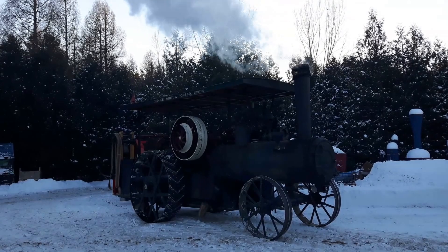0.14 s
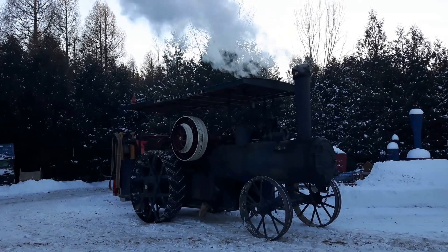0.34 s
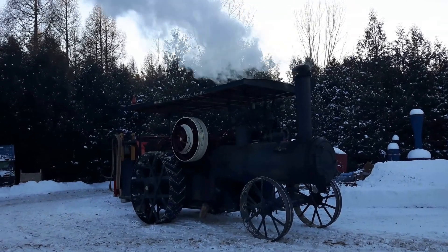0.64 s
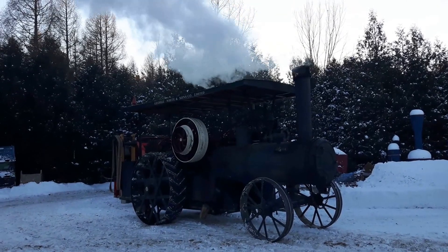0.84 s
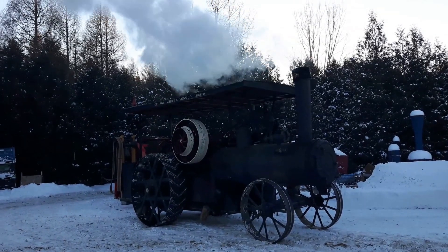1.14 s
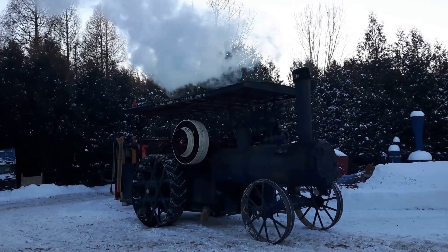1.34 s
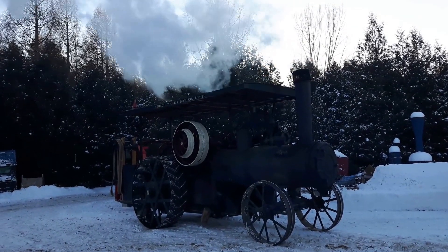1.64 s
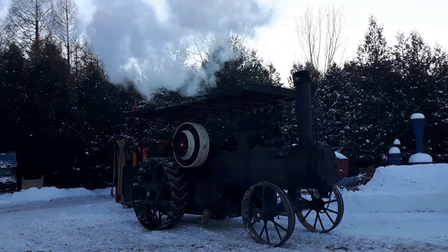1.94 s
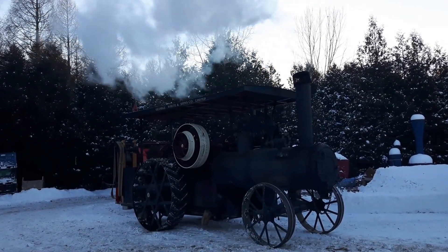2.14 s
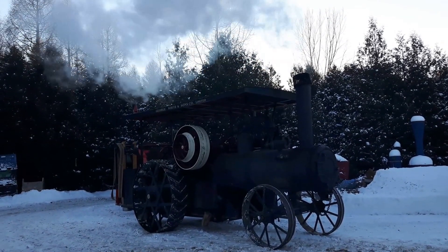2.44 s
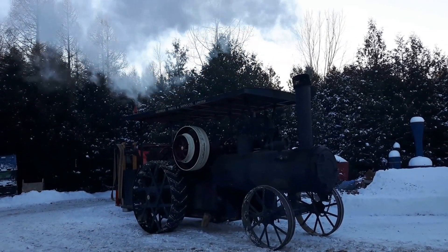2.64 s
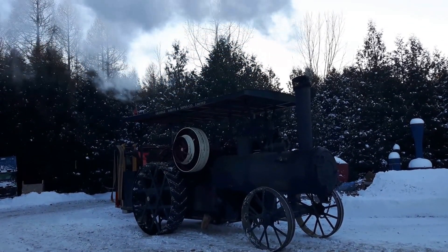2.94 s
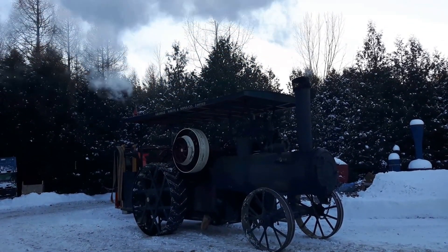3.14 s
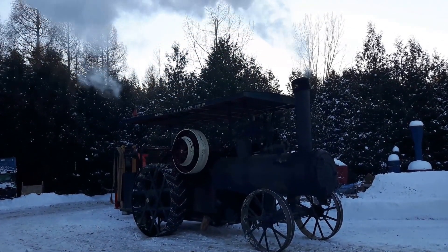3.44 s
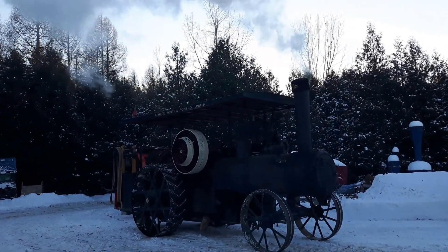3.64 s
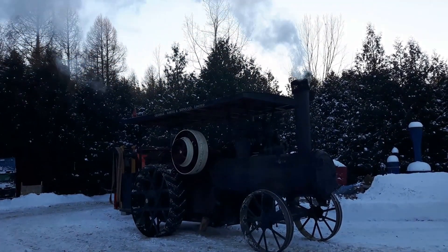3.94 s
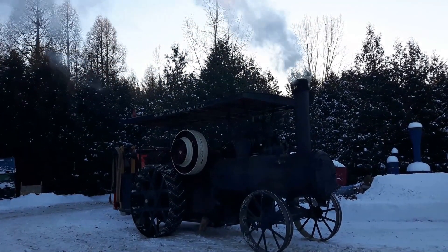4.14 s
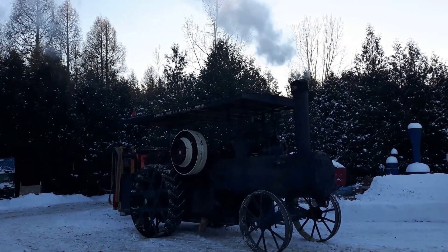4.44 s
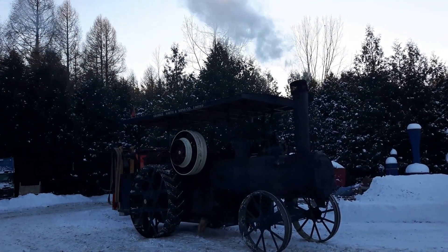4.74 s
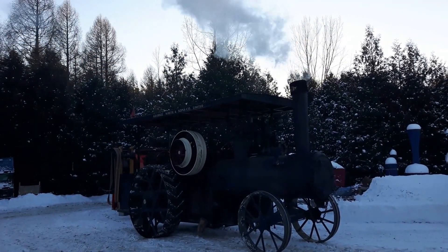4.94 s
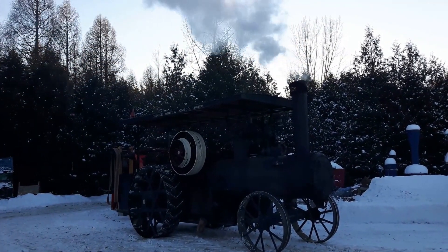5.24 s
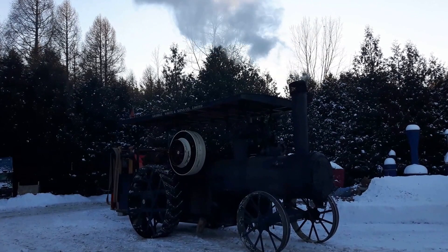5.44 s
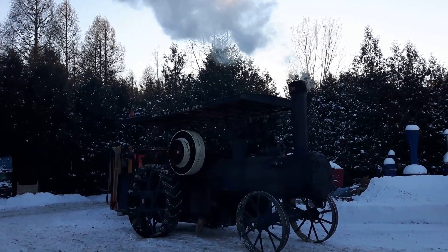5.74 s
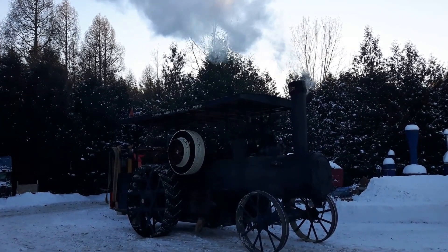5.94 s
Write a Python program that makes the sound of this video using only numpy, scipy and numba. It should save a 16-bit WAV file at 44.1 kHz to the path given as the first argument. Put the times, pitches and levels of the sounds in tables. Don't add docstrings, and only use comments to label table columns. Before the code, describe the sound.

Low, wavering engine hum beside softly hissing steam and fire draught; one short hard thump, then a quick metallic clatter with a deep bump.

```python
import sys
import numpy as np
from scipy import signal
from scipy.io import wavfile
from scipy.ndimage import uniform_filter1d
from numba import njit

SR = 44100
rng = np.random.default_rng(int(sys.argv[2]) if len(sys.argv) > 2 else 0)


def attenuation_scalar(level_db):
    decades = np.asarray(level_db, float) / 20
    return 10 ** decades


def unload_wav(signal):
    wavfile.write(
        sys.argv[1],
        SR,
        np.round(np.clip(np.atleast_2d(signal).T, -1, 1) * 32767).astype(np.int16),
    )


N = 269010
TIME = np.arange(N) / SR

# time in seconds, turn rate in Hz, load as level of the booming fifth order in dB.
IDLE_CURVE = [(0.0, 24.3, -33), (0.13, 24.0, -34), (0.46, 25.6, -36), (1.0, 24.7, -41), (1.51, 25.6, -48),
              (1.68, 25.9, -35), (2.01, 25.3, -46), (2.29, 26.6, -32), (2.57, 25.0, -42), (2.84, 26.5, -34),
              (3.27, 24.7, -41), (4.05, 23.3, -42), (4.74, 25.1, -37), (5.0, 25.2, -32), (5.11, 24.4, -35),
              (5.69, 26.5, -32), (5.98, 25.0, -30), (6.08, 25.3, -31)]
# order (multiple of the turn rate), mean level in dB.
EXHAUST_ORDERS = [(1, -39.5), (2, -26.5), (3, -31), (4, -10.5), (5, 2), (6, -10), (7, -5.5), (8, -21),
                  (9, -10), (10, -7.5), (11, -17), (12, -28.5), (13, -14.5), (14, -19), (15, -23.5),
                  (16, -26.5)]
# order, mean level in dB, slope in dB per dB of load, slope in dB per Hz of speed.
STRONG_ORDERS = [(4, -44, -.4, -.6), (5, -38, 1.01, .01), (7, -45, .05, 1.8), (10, -46, .1, .3)]
# resonance in Hz, width in Hz, lift in dB.
SILENCER_CAVITIES = [(341, 9.6, 7), (140, 3, 6.5), (225.8, 7.2, 3), (363.3, 5.5, 4.5)]
# centre in seconds, length in seconds, order, change in dB.
ECHO_BEATS = [(3.24, .12, 5, -4), (.31, .15, 4, 5), (1.68, .12, 4, -8), (2.22, .35, 4, -6),
              (2.95, .4, 4, 4), (4.66, .25, 4, -22), (4.93, .12, 4, -25), (5.4, .9, 4, -11),
              (1.36, .2, 5, -3), (2.62, .06, 5, -9), (3.96, .1, 5, -10), (.31, .2, 7, 5), (.2, .7, 14, -7),
              (2.05, .25, 7, 4), (4.15, .35, 5, 2.5), (4.24, .15, 7, 5), (4.78, .12, 7, -7),
              (5.28, .25, 7, -5), (3.6, .9, 7, -4), (.28, .35, 10, -5), (1.44, .12, 10, -12),
              (3.75, 1.1, 13, -6), (2.95, .9, 9, -4), (1.97, .4, 10, -11), (3.6, 2.2, 10, 3),
              (5.45, .5, 14, 6), (3.07, .15, 5, 3), (4.24, .12, 10, -8), (4.75, .2, 10, 5),
              (5.7, .8, 10, -5)]
# start in seconds, peak level in dB, brightness in dB.
DOOR_BOUNCES = [
    (4.7195, -31, -3),
    (4.7245, -33, -15),
    (4.7525, -37, 1),
    (4.7605, -26, -10),
    (4.769, -37, -16),
    (4.799, -39, -12),
    (4.832, -39, -8),
    (4.896, -39, -6),
]
# frequency in Hz, level in dB, t60 in seconds.
DOOR_MODES = [(719.3, 3, .045), (941.7, -4, 0.11), (1147, -9, 0.044), (1409.4, -4, 0.032), (1760, -10, .04),
              (1970, -4, .03), (2300, -10.5, 0.052), (3000, -9, 0.02)]
# start in seconds, peak level in dB, frequency in Hz, t60 in seconds.
BUMPS = [(.75, -38, 70, .15), (1.23, -37, 75, .15), (1.77, -40, 68, .12), (2.07, -37, 62, 0.14),
         (2.555, -32, 130, 0.065), (2.607, -25, 129, 0.065), (2.597, -35, 66, 0.12), (4.74, -36, 68, .2),
         (4.762, -25, 92, .26), (4.77, -35, 58, .25), (4.805, -31, 92, .16)]
# start in seconds, peak level in dB, frequency in Hz, t60 in seconds.
KNOCKS = [(1.42, -51, 696.7, .05), (1.723, -54, 600, 0.036), (1.839, -54, 600, .04),
          (1.8747, -45, 721, .04), (1.8747, -49, 900, .04), (2.320, -45, 703, .07),
          (2.578, -35, 580, 0.022), (2.578, -42, 900, .02), (2.581, -40, 330.6, 0.036),
          (2.6029, -24, 327, 0.019), (2.6045, -27, 650, .012), (3.32, -43, 390, 0.079),
          (4.245, -44.5, 558.7, 0.097), (5.118, -49, 1094, 0.083)]
# start in seconds, length in seconds, level in dB, start pitch in Hz, end pitch in Hz.
CREAKS = [
    (1.03, 0.093, -53, 590, 518),
    (1.174, .08, -48, 567, 542),
]
# start in seconds, peak level in dB, centre in Hz.
TICKS = [(0.371, -64, 4500), (1.005, -63.5, 4500), (2.09, -66, 3600), (2.2165, -59, 4200),
         (2.2165, -59, 7500), (3.49, -65, 14000), (3.85, -61, 14800), (3.85, -68, 13600),
         (5.86, -62, 14500), (4.76, -67, 7500), (4.7198, -55, 4300)]
# centre in Hz, width in Hz, level in dB.
STEAM_LEAKS = [(2050, 140, -71), (2995, 370, -80.5), (1000, 134, -67), (4500, 250, -91), (5610, 420, -90),
               (6830, 280, -89.5), (12800, 900, -92), (15400, 900, -94)]
# centre in Hz, width in Hz, resting level in dB.
STEAM_JETS = [(7750, 600, -83.5), (8850, 800, -81.5), (13530, 250, -99)]
# centre in seconds, length in seconds, jet number, change in dB.
JET_SPURTS = [
    (1.9, 1.1, 0, -3),
    (4.0, .8, 0, -4),
    (6.0, 1.5, 0, 4.5),
    (3.0, .9, 1, -3.5),
    (4.9, .4, 1, -9),
    (.05, 1.1, 2, 8),
    (1.17, .5, 2, 12),
    (3.5, .7, 2, 8),
    (4.9, 1.9, 2, 4),
]
# frequency in Hz, density in dB per Hz.
DRAUGHT_SPECTRUM = [(25, -33), (48, -16.5), (96, -9.5), (190, -12.5), (330, -16.5), (434, -19), (1060, -30),
                    (1570, -34.5), (2500, -44.5), (3300, -50.5), (4300, -59), (6300, -57), (9000, -56.5),
                    (11000, -65), (15700, -59)]


def engine():
    hz, load = control(column=1), control(column=2)
    strong = {}
    for order, db, per_load, per_turn in STRONG_ORDERS:
        response = per_load * (load + 38) + per_turn * (hz - 25)
        strong[round(order)] = db + response + swells(ECHO_BEATS, round(order))
    common = 10 * np.log10(sum(attenuation_scalar(2 * db) for db in strong.values()))
    common = uniform_filter1d(common, SR // 2)
    turns = np.cumsum(hz * (1 + 0.00092 * walk(13))) / SR
    out = 0
    for order, db in EXHAUST_ORDERS:
        lift = sum(g / (1 + ((order * hz - f) / w) ** 2) for f, w, g in SILENCER_CAVITIES)
        minor = db - 37 + swells(ECHO_BEATS, round(order)) + .4 * (common - common.mean())
        minor = minor + lift - lift.mean() + 1.95 * walk(3)
        level = strong.get(order, minor) + (.6 + .08 * order) * walk(18)
        lag = rng.random() + .2 * walk(1.2) + .0018 * order * walk(10)
        out = out + np.sqrt(2) * attenuation_scalar(level) * np.cos(2 * np.pi * (order * turns - lag))
    return out, turns % 1


def door():
    out, t = np.zeros(N), TIME[:int(.25 * SR)]
    for s, db, bright_db in DOOR_BOUNCES:
        strikes = rng.standard_normal((len(DOOR_MODES), 2))
        for (hz, mode_db, t60), (detune, share) in zip(DOOR_MODES, strikes):
            gain = db - 8.0 + mode_db + 1.66 * share + (hz > 1700) * (bright_db + 5.5)
            add(out, s, attenuation_scalar(gain) * ring(hz * (1 + .02 * detune), t60, 0.0005))
        scrape = svf(svf(rng.standard_normal(len(t)), 1450., 1200.0), 1450., 1500.0)
        crack, tail = attenuation_scalar(-60 * t / .018), attenuation_scalar(-10 - 60 * t / .4)
        add(out, s, attenuation_scalar(db - 2.5) * scrape * (crack + tail))
    return signal.sosfilt(signal.butter(4, 3700, fs=SR, output="sos"), out)


def small_hits():
    out = np.zeros(N)
    for hits, rise in ((BUMPS, 0.0044), (KNOCKS, 0.00049)):
        for s, db, hz, t60 in hits:
            add(out, s, attenuation_scalar(db) * ring(hz, t60, rise))
    for s, length, db, start_hz, end_hz in CREAKS:
        hz = np.linspace(start_hz, end_hz, int(length * SR))
        add(out, s, attenuation_scalar(db) * np.hanning(len(hz)) * np.sin(2 * np.pi * np.cumsum(hz) / SR))
    t = TIME[:int(.04 * SR)]
    for s, db, hz in TICKS:
        burst = svf(svf(rng.standard_normal(len(t)), float(hz), 1500.), float(hz), 1500.)
        add(out, s, attenuation_scalar(db + 6.5) * burst * attenuation_scalar(-60 * t / .04))
    return out


def draught(cycle):
    f, density = np.transpose(DRAUGHT_SPECTRUM)
    load = uniform_filter1d(control(column=2), int(1.1 * SR))
    out, swell = 0, walk(1.2)
    puff = np.cos(2 * np.pi * cycle)
    for hz in 28 * 2 ** np.arange(0, 9.2, 1 / 3):
        band = unit(svf(svf(rng.standard_normal(N), hz, 0.36 * hz), hz, 0.36 * hz))
        db = np.interp(np.log(hz), np.log(f), density) + 10 * np.log10(hz / 1000)
        waver = (.5 * swell + .6 * walk(.7) + 1.2 * walk(11)) * (.55 if hz > 3500 else 1)
        gust = .2 * (load - load.mean()) * (.3 if hz > 3500 else 1)
        out = out + attenuation_scalar(db + waver + gust + .8 * puff * (300 < hz < 3000)) * band
    middle = svf(out, 1232.0, 2500.)
    return out / np.sqrt(np.mean(middle ** 2)) * attenuation_scalar(-53)


def steam():
    bands = [(f, w, db + .8 * walk(.8)) for f, w, db in STEAM_LEAKS]
    bands += [(f, w, db + swells(JET_SPURTS, jet)) for jet, (f, w, db) in enumerate(STEAM_JETS)]
    out = 0
    for f, w, db in bands:
        narrow = svf(rng.standard_normal(N), float(f), float(w))
        hiss = unit(svf(narrow, float(f), 2. * w))
        out = out + attenuation_scalar(db + 1.6 * walk(9.9)) * hiss
    return out


def control(column):
    rows = np.array(IDLE_CURVE)
    return uniform_filter1d(np.interp(TIME, rows[:, 0], rows[:, column]), int(.06 * SR))


def swells(rows, which):
    return sum(db * np.exp(-(2 * (TIME - s) / length) ** 2)
               for s, length, voice, db in rows if round(voice) == which)


def walk(rate):
    k = int(SR / rate)
    held = np.repeat(rng.standard_normal(N // k + 1), k)
    return 1.29 * uniform_filter1d(uniform_filter1d(held, k), k)[:N]


def ring(hz, t60, rise):
    t = TIME[:int(1.2 * t60 * SR)]
    return np.sin(2 * np.pi * hz * t) * attenuation_scalar(-60 * t / t60) * (1 - np.exp(-t / rise))


@njit
def svf(x, hz, width):
    y, b, l = np.empty(len(x)), 0., 0.
    g, k = np.tan(np.pi * hz / SR), width / hz
    for i in range(len(x)):
        v = (b + g * (x[i] - l)) / (1 + g * (g + k))
        b, l, y[i] = 2 * v - b, l + 2 * g * v, k * v
    return y


def unit(x):
    return x / np.sqrt(np.mean(x ** 2))


def add(out, s, sound):
    i = int(s * SR)
    out[i:i + len(sound)] += sound[:N - i]


def scene():
    drone, cycle = engine()
    return (drone + door() + small_hits() + draught(cycle) + steam())[None]


def roll_off(x):
    return signal.sosfilt(signal.butter(12, 15719, fs=SR, output="sos"), x)


def record(dry):
    mix = dry - .0007
    return roll_off(mix)


dry = scene()
out = record(dry)
unload_wav(out)
```